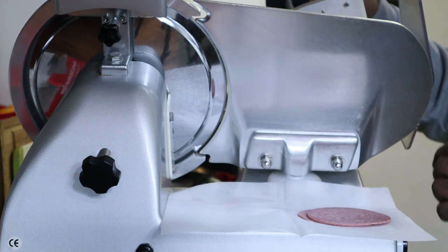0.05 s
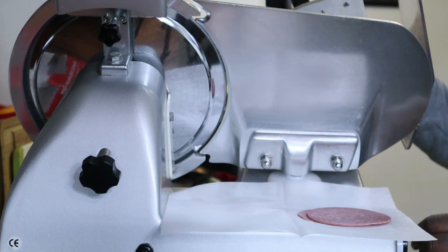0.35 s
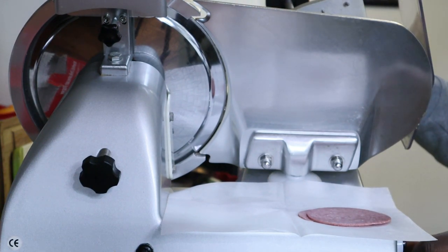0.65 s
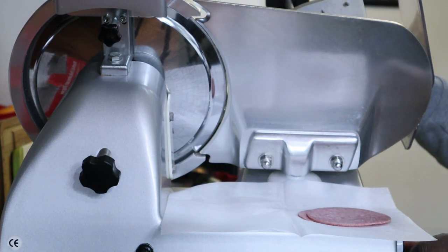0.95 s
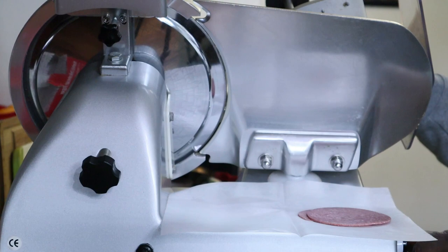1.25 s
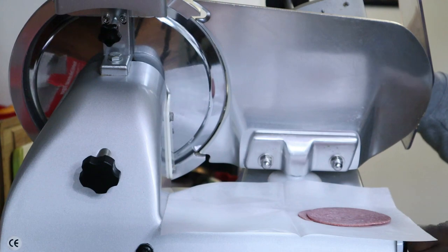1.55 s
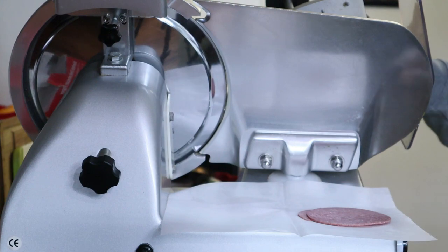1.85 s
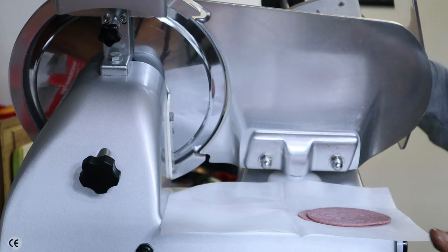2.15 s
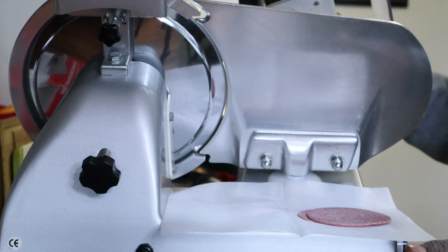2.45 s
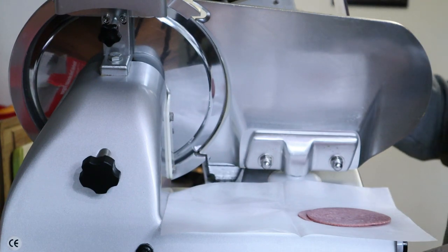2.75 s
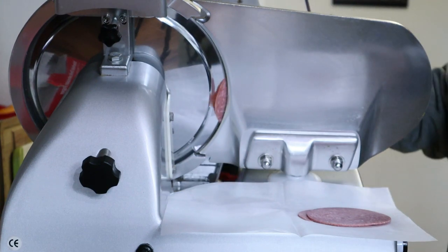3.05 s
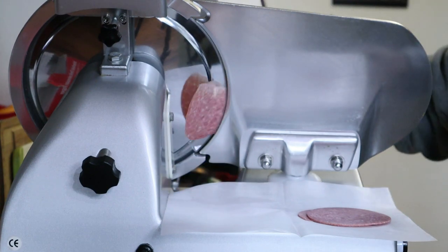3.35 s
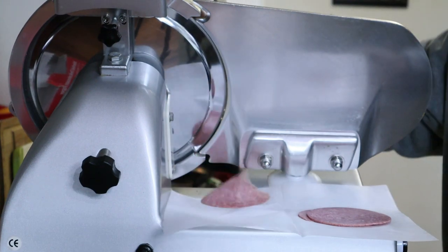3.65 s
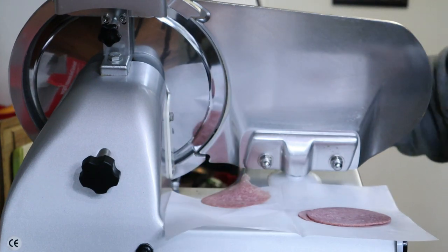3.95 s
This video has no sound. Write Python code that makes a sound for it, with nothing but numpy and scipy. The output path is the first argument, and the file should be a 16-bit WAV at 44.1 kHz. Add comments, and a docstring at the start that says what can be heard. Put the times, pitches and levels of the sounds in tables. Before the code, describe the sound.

A meat slicer's motor starts with a switch snap and a brief rattle, then hums and whines steadily. Its carriage slides forward, the blade cuts one slice with a hiss, and a clack ends the stroke, echoing slightly in the kitchen.

```python
"""An electric meat slicer in a kitchen

After some handling, the switch snaps on and the motor spins up with a shudder, then hums and whines.
The carriage (the sliding meat tray) is pushed forward. The blade hisses through the meat and drags
the motor down a little, and the carriage ends its stroke with a clack and a knock."""
import sys
import numpy as np
from scipy import signal
from scipy.fft import rfft, irfft
from scipy.io import wavfile

SR = 44100
rng = np.random.default_rng(int(sys.argv[2]) if len(sys.argv) > 2 else 0)


def log_audio(samples):
    """Write samples as a 16-bit WAV file to the path given in sys.argv[1]."""
    # one column per channel
    frames = np.atleast_2d(samples).T
    # limit to full scale, then quantise
    limited = np.clip(frames, -1, 1)
    pcm = np.round(limited * 32767).astype(np.int16)
    wavfile.write(sys.argv[1], SR, pcm)


N = 176400
T = np.arange(N) / SR

# How fast the motor turns: time_s, turns_per_s
MOTOR_SPEED = [(1.56, 0), (1.63, 13), (1.70, 27.5), (1.75, 29), (1.80, 29.77), (3.03, 29.78), (3.14, 29.45),
               (3.33, 29.25), (3.54, 29.42), (3.63, 29.77), (3.94, 29.77), (4.0, 29.1)]
# The magnetic hum, at twice the mains frequency: time_s, level_db
HUM_LEVEL = [(1.55, -67), (1.62, -42), (1.73, -31.5), (1.78, -39), (1.80, -29), (1.85, -26), (2.08, -25),
             (2.3, -23), (2.72, -24.5), (3.02, -26), (3.33, -29), (3.6, -28.5), (3.66, -24), (3.78, -28),
             (3.85, -25.5), (4.0, -25)]
# Buzzing tones at 2 to 6 times the hum's pitch: level_db, drop_while_cutting_db
BUZZ_LEVELS = [(-44, -3), (-50, -3), (-43.5, 1.5), (-48.5, 7), (-59, 4)]
# Each whine pitch adds a multiple of the speed to one of the hum: speed_multiple, hum_multiple
WHINE_PITCHES = [(34, 0), (34, 1), (33, 2), (34, 2), (35, 2), (68, 0), (68, 1), (68, 4), (68, 5)]
# How loud those same whine tones are: level_db, drop_while_cutting_db
WHINE_LEVELS = [(-45.5, 12), (-52.5, -4.5), (-58.5, -3), (-39.5, 0.5), (-46.5, 4.5), (-49.5, 7), (-56, -4),
                (-56, 0), (-58.5, 1)]
# Bearings and belt, heard through the casing: pitch_hz, level_db_per_hz
BEARING_NOISE = [(30, -83.5), (110, -59.5), (200, -78.5), (330, -61.5), (420, -78.5), (700, -72),
                 (880, -76.5), (1080, -71), (1220, -66), (1400, -73), (1650, -80.5), (2100, -78),
                 (2300, -81), (2620, -73.5), (3000, -81.5), (4400, -89), (5000, -84), (5700, -90),
                 (8200, -88.5), (9800, -102), (15500, -106)]
# How hard the blade cuts, which also shapes the hiss in cutting(): time_s, gain_db
CUT_STRENGTH = [(3.0, -23), (3.06, -1.5), (3.2, 1), (3.36, 1.5), (3.5, 1.5), (3.57, -1), (3.62, -10),
                (3.66, -38)]
def motor():
    """An induction motor: its magnetic field hums, its slotted rotor whines, its bearings and belt rub."""
    mains_hz, repeat_share, throb_depth = 60, 0.53, 0.087
    speed = curve(MOTOR_SPEED)
    turns = np.cumsum(speed) / SR
    speed_share = speed / speed.max()
    load = swell(CUT_STRENGTH) / swell(CUT_STRENGTH).max()
    hum_phase = 2 * np.pi * 2 * mains_hz * T
    out = swell(HUM_LEVEL) * tone(hum_phase)
    for multiple, (db, drop_db) in enumerate(BUZZ_LEVELS, start=2):
        gain = speed_share * amp(db - drop_db * load + drift(rate_hz=1.8))
        out += gain * tone(multiple * hum_phase + 2 * np.pi * rng.random())
    for (speed_multiple, hum_multiple), (db, drop_db) in zip(WHINE_PITCHES, WHINE_LEVELS):
        gain = speed_share * amp(db - drop_db * load + 0.7 * drift(rate_hz=8))
        out += gain * tone(2 * np.pi * speed_multiple * turns + hum_multiple * hum_phase)
    # Part of the rubbing comes round again on every turn; the rest is always new.
    one_turn = rng.standard_normal(int(SR / speed.max()))
    repeating = one_turn[(turns % 1 * len(one_turn)).astype(int)] * speed_share
    rubbing = np.sqrt(repeat_share) * repeating + np.sqrt(1 - repeat_share) * rng.standard_normal(N)
    throb = 1 + throb_depth * np.sin(hum_phase)
    return out + coloured(rubbing * speed_share * throb, BEARING_NOISE)


# The hiss of meat on the blade: pitch_hz, level_db_per_hz
MEAT_HISS = [(1000, -79.5), (1700, -79.5), (3000, -80), (5000, -81.5), (8000, -85), (10000, -85),
             (15500, -87)]
# Where the blade rings: pitch_hz, width_hz, gain_db
BLADE_RING = [(4450, 140, -13.5), (4950, 210, -12.5), (5500, 150, -11), (6480, 150, -7), (7330, 170, -5),
              (7960, 210, -1), (9330, 180, -6.5), (9700, 140, -13), (10900, 180, -6.5), (12340, 140, -7),
              (13900, 220, -6)]
# The blade rasps in the thick of the meat: time_s, gain_db
RASP_STRENGTH = [(3.05, -15), (3.2, -16), (3.36, -4), (3.38, 7), (3.4, -2), (3.5, -11), (3.6, -3)]
# The sound of that rasp: pitch_hz, level_db_per_hz
RASP_NOISE = [(1200, -97), (2000, -93), (3600, -75.5), (4900, -81), (6000, -87), (9000, -99)]
def cutting():
    """Meat rubs unevenly on the spinning blade: a hiss, a high ringing and a lower rasp."""
    hiss = coloured(friction(grain_db=0.5), MEAT_HISS)
    ringing = amp(-42) * resonate(friction(grain_db=0.5), BLADE_RING)
    rasp = coloured(friction(grain_db=3.1), RASP_NOISE)
    surge = amp(1.6 * drift(rate_hz=25))
    return (swell(CUT_STRENGTH) * (hiss + ringing) + swell(RASP_STRENGTH) * rasp) * surge


# The casing rattles as the drive gets the blade going: time_s, level_db
RATTLE_LEVEL = [(1.60, -61), (1.64, -36.5), (1.68, -40), (1.70, -24.5), (1.72, -34), (1.742, -27),
                (1.775, -46), (1.83, -70)]
# Where the casing rings: pitch_hz, width_hz, gain_db
CASING_RING = [(1220, 86, 8), (2560, 68, -2.5), (2150, 300, -9), (770, 300, -4.5), (324, 45, 0.5)]
# The machine rocks on its feet: start_s, length_s, pitch_hz, level_db
ROCKING = [(1.475, .11, 27, -44), (1.589, 0.16, 49.6, -31.5), (3.712, .11, 52, -37)]
def shudder():
    """The casing rattles as the blade starts, and jolts rock the whole machine."""
    out = swell(RATTLE_LEVEL) * resonate(friction(grain_db=5.5), CASING_RING)
    for start_s, length_s, hz, db in ROCKING:
        t = T[:int(length_s * SR)]
        envelope = np.sin(np.pi * t / length_s)
        add(out, start_s, amp(db) * envelope * tone(2 * np.pi * hz * t))
    return out


# The blade's faint singing before the cut: time_s, level_db
SINGING_LEVEL = [(1.76, -66), (1.84, -44.5), (2.1, -48.5), (2.28, -40), (2.37, -57)]
def singing():
    """The freely spinning blade gives one thin, wavering tone."""
    pitch_hz = 1439 + 5 * drift(rate_hz=12)
    waver = amp(2 * drift(rate_hz=25))
    return swell(SINGING_LEVEL) * waver * tone(2 * np.pi * np.cumsum(pitch_hz) / SR)


# The carriage clacks and bounces: start_s, gain_db
CLACK_HITS = [(3.6317, -2.5), (3.6364, 0.5), (3.647, 0), (3.65, -13), (3.6625, -20), (3.680, -12)]
# The sound of one clack: pitch_hz, level_db_per_hz
CLACK_NOISE = [(200, -77), (900, -76), (1500, -54), (2400, -64), (3300, -54), (5500, -61), (7900, -51),
               (10000, -59.5), (15500, -62)]
# The carriage meets its end stop: start_s, gain_db
STOP_HITS = [(3.6955, -9), (3.6985, 2), (3.7012, 2)]
# The tones of that knock: pitch_hz, level_db, ring_s
STOP_TONES = [(330, -33.5, 0.089), (760, -25.5, 0.02), (896, -21, 0.029), (1106, -18.5, .025),
              (1714, -29, 0.062), (2060, -21.5, .02)]
# The carriage bumps on its rail: start_s, gain_db
BUMP_HITS = [(2.0833, 4), (2.7981, -0.5)]
# The tones of one bump: pitch_hz, level_db, ring_s
BUMP_TONES = [(292, -30, 0.053), (410, -34.5, 0.055), (553, -26, 0.032), (665, -30.5, 0.041),
              (1000, -46, 0.017)]
def carriage_knocks():
    """The carriage bumps on its rail, then clacks and hits the stop at the end of its stroke."""
    out = np.zeros(N)
    for start_s, db in BUMP_HITS:
        add(out, start_s, amp(db) * ring(BUMP_TONES))
    for start_s, db in CLACK_HITS:
        add(out, start_s, amp(db) * crack(CLACK_NOISE, fade_s=0.0074))
    for start_s, db in STOP_HITS:
        add(out, start_s, amp(db) * ring(STOP_TONES))
    return out


# The carriage rumbles along its rail: time_s, level_db
RUMBLE_LEVEL = [(2.6, -52), (2.85, -55), (3.1, -39.5), (3.3, -42.5), (3.6, -48.5), (3.8, -37.5), (4.0, -51)]
# Where the frame rings: pitch_hz, width_hz, gain_db
FRAME_RING = [(192, 46, -9.5), (240, 32, -4), (323, 39, 1.5), (357, 21, 1.5), (510, 76, -7)]
def sliding():
    """The carriage's runners shake the frame, which rings at its low pitches."""
    return swell(RUMBLE_LEVEL) * resonate(rng.standard_normal(N), FRAME_RING)


# The eight bands, low to high, that describe switch clicks, taps and rubs: pitch_hz
BANDS_HZ = (120, 350, 800, 1400, 2800, 5200, 8000, 13000)
# The switch is pressed, then snaps home: start_s, fade_s, then level_db_per_hz for each band
SWITCH_CLICKS = [(1.4669, 0.0066, -74, -48.5, -59, -61, -61, -75.5, -71, -94),
                 (1.546, 0.0066, -62, -53.5, -53, -52.5, -57.5, -57, -64.5, -69.5)]
# The tones of the snap: pitch_hz, level_db, ring_s
SWITCH_TONES = [(325, -40, 0.29), (787, -35, .08), (1755, -36, .1), (2560, -43, 0.044), (3300, -40, 0.15),
                (3660, -48, .17), (4510, -32, 0.083), (5125, -52, .18)]
# The rattle of the switch's spring: pitch_hz, level_db_per_hz
SPRING_NOISE = [(2500, -96), (3600, -65), (5400, -70), (6000, -71), (6600, -64), (7200, -74), (7900, -96)]
def switch():
    """Two clicks; the second rings on and rattles the spring."""
    out = clicks(SWITCH_CLICKS)
    snap_s = SWITCH_CLICKS[-1][0]
    add(out, snap_s, ring(SWITCH_TONES))
    add(out, snap_s, crack(SPRING_NOISE, fade_s=0.042))
    return out


# Small ticks from the slice: start_s, gain_db
SLICE_TICKS = [(3.731, -4), (3.741, 1), (3.759, 1), (3.777, 0), (3.791, 1), (3.805, -5)]
# The sound of one tick: pitch_hz, level_db_per_hz
TICK_NOISE = [(400, -68), (2000, -73), (4000, -68), (9000, -70), (15000, -78)]
def slice_ticks():
    """The slice comes free with a quick run of ticks."""
    out = np.zeros(N)
    for start_s, db in SLICE_TICKS:
        add(out, start_s, amp(db) * crack(TICK_NOISE, fade_s=0.0014))
    return out


# Light taps and ticks: start_s, fade_s, then level_db_per_hz for each band
LIGHT_TAPS = [(.0688, 0.0011, -80, -74, -81, -62, -59, -62, -70, -58),
              (.337, 0.0057, -84, -70, -76, -69, -67, -80, -81, -94),
              (1.0751, 0.0019, -83, -67, -74, -65, -58, -94, -86, -92),
              (1.1028, 0.0034, -74, -62.5, -55.5, -52, -56, -79, -84, -83),
              (1.4265, 0.0025, -80, -75, -72, -59.5, -66, -84, -82, -95),
              (1.695, 0.012, -50, -66, -68, -70, -63, -76, -71.5, -86),
              (1.746, 0.004, -75, -74, -70, -63, -64.5, -75, -77, -98),
              (2.0828, .0018, -62, -52, -48, -48.5, -52, -65.5, -69, -88),
              (2.4027, 0.0017, -75, -61, -70, -72, -78, -87, -88, -96),
              (2.6339, .005, -81, -70, -72, -73, -68, -68, -74, -79),
              (2.7975, 0.0038, -69, -52, -54, -61, -70, -86, -90, -96)]
def taps():
    """Light taps and ticks from handling, the carriage and the motor starting: tiny bursts of noise."""
    return clicks(LIGHT_TAPS)


# Rubs during handling: peak_s, rise_s, fall_s, then level_db_per_hz for each band
HANDLING_RUBS = [(.075, 0.034, 0.07, -87, -84, -74, -79, -76, -76, -83, -87),
                 (.20, .05, 0.17, -77, -68, -83, -86, -88, -98, -100, -100),
                 (0.364, 0.041, 0.087, -68.5, -71, -76.5, -73.5, -77, -82, -88, -98),
                 (.765, 0.0089, 0.017, -85, -78, -82, -82, -87, -95, -100, -106),
                 (.87, 0.024, 0.026, -82, -81, -81, -80, -89, -101, -102, -108),
                 (1.094, 0.013, 0.02, -78, -64, -73, -71, -71, -88, -83.5, -100),
                 (1.36, .02, 0.02, -85, -70, -79, -71.5, -81, -95, -102, -104),
                 (2.105, 0.014, 0.075, -64, -60, -76, -64, -84, -79, -92, -101),
                 (2.66, 0.091, 0.16, -89, -80, -71, -75, -82, -83, -87, -94),
                 (2.754, 0.018, 0.024, -78, -69, -78, -63, -67.5, -79, -81, -94),
                 (2.83, 0.15, 0.16, -82, -60.5, -79, -71, -79, -83.5, -86, -95),
                 (3.655, 0.016, 0.062, -67, -59, -69, -65, -69, -65, -79, -91),
                 (3.76, 0.03, .035, -62, -55.5, -72, -72, -71, -80, -77.5, -101),
                 (3.99, 0.082, .06, -75, -68, -73, -72, -74, -81.5, -85, -93)]
def rubs():
    """Gloves, sleeve and carriage rub in short, grainy slides that swell and die away."""
    out = np.zeros(N)
    for peak_s, rise_s, fall_s, *levels in HANDLING_RUBS:
        envelope = np.exp(-np.maximum((peak_s - T) / rise_s, (T - peak_s) / fall_s))
        out += envelope * coloured(friction(grain_db=1), list(zip(BANDS_HZ, levels)))
    return out


# The kitchen's echo is duller at the top: pitch_hz, gain_db
ECHO_COLOUR = [(100, 11), (400, 10), (5000, 0.5), (14000, -2)]
def kitchen_echo(sound):
    """Hard walls throw a sound back as many echoes that blur together."""
    ring_s, rise_s, echo_db = 0.33, 0.0013, -7
    t = T[:SR // 2]
    envelope = np.exp(-np.log(1000) * t / ring_s) * (1 - np.exp(-t / rise_s))
    tail = coloured(rng.standard_normal(len(t)), ECHO_COLOUR) * envelope
    tail /= np.sqrt(np.sum(tail ** 2))
    return amp(echo_db) * signal.fftconvolve(sound, tail)[:N]


# Room air and ventilation: pitch_hz, level_db_per_hz
AIR_NOISE = [(25, -69.5), (70, -81.5), (150, -72.5), (310, -72), (480, -78), (600, -77.5), (700, -80),
             (850, -83.5), (1500, -87.5), (2300, -91.5), (2630, -88), (3050, -93), (5100, -97.5),
             (5800, -99), (8000, -98.5), (10000, -102), (15500, -104)]
# Where the air duct rings: pitch_hz, width_hz, gain_db
DUCT_RING = [(706.3, 6.9, 0), (2620, 24, -5.5), (4600, 140, -10), (5140, 31, -11.5)]
def room_air():
    """Moving air makes a steady rush and rings faintly in the duct."""
    rush = coloured(rng.standard_normal(N), AIR_NOISE)
    return rush + amp(-54) * resonate(rng.standard_normal(N), DUCT_RING)


def amp(db):
    """Turn decibels into a number to multiply by."""
    return 10 ** (np.asarray(db) / 20)


def rms_one(x):
    """Scale a signal so its average strength (rms) is 1."""
    return x / np.sqrt(np.mean(x ** 2) + 1e-20)


def tone(phase):
    """A sine wave of strength 1."""
    return np.sqrt(2) * np.sin(phase)


def curve(rows):
    """Join (time_s, value) rows by straight lines."""
    return np.interp(T, *np.transpose(rows))


def swell(rows):
    """A changing gain from (time_s, level_db) rows, silent outside them."""
    return amp(np.interp(T, *np.transpose(rows), left=-150, right=-150))


def drift(rate_hz):
    """A smooth random wobble of strength 1, mostly slower than rate_hz."""
    f = np.fft.rfftfreq(N, 1 / SR)
    return rms_one(irfft(rfft(rng.standard_normal(N)) / (1 + (f / rate_hz) ** 2), N))


def coloured(noise, spectrum):
    """Shape the lows and highs of white noise by (pitch_hz, level_db_per_hz) rows."""
    hz, db = np.transpose(spectrum)
    f = np.maximum(np.fft.rfftfreq(len(noise), 1 / SR), 1)
    gain = amp(np.interp(np.log(f), np.log(hz), db))
    return irfft(rfft(noise) * gain, len(noise)) * np.sqrt(SR / 2)


def resonate(x, peaks):
    """Make a signal ring at (pitch_hz, width_hz, gain_db) peaks; the result has strength 1."""
    out = np.zeros(len(x))
    for k, (hz, width_hz, db) in enumerate(peaks):
        band = signal.lfilter(*signal.iirpeak(hz, hz / width_hz, fs=SR), x)
        out += amp(db) * rms_one(band) * (-1) ** k
    return rms_one(out)


def friction(grain_db):
    """White noise broken into short grains; more grain_db is rougher."""
    return rms_one(rng.standard_normal(N) * amp(grain_db * drift(rate_hz=330)))


def add(out, start_s, sound):
    """Mix a sound in at start_s."""
    i = int(start_s * SR)
    out[i:i + len(sound)] += sound[:N - i]


def crack(spectrum, fade_s, rise_s=0.00055):
    """Two things touch: a burst of noise that falls to about a third every fade_s."""
    t = T[:SR // 10]
    envelope = np.exp(-t / fade_s) * (1 - np.exp(-t / rise_s))
    return coloured(rng.standard_normal(len(t)), spectrum) * envelope


def clicks(rows):
    """Play one crack for each row, with its own level in each band."""
    out = np.zeros(N)
    for start_s, fade_s, *levels in rows:
        add(out, start_s, crack(list(zip(BANDS_HZ, levels)), fade_s))
    return out


def ring(tones):
    """A struck object: each of its tones fades by 60 dB in ring_s."""
    t = T[:SR // 2]
    return sum(amp(db) * np.exp(-np.log(1000) * t / ring_s) * np.sin(2 * np.pi * hz * t) * (-1) ** k
               for k, (hz, db, ring_s) in enumerate(tones))


def scene():
    """Mix the slicer, its handling and the room; only the clicks and knocks get an echo."""
    machine = motor() + cutting() + shudder() + singing() + sliding()
    hits = carriage_knocks() + switch() + slice_ticks() + taps()
    return (machine + hits + rubs() + kitchen_echo(hits) + room_air())[None]


def record(dry):
    """Cut the very highest treble steeply."""
    cutoff_hz = 15850
    return signal.sosfilt(signal.ellip(14, .2, 110, cutoff_hz, fs=SR, output="sos"), dry)


dry = scene()
out = record(dry)
log_audio(out)
```